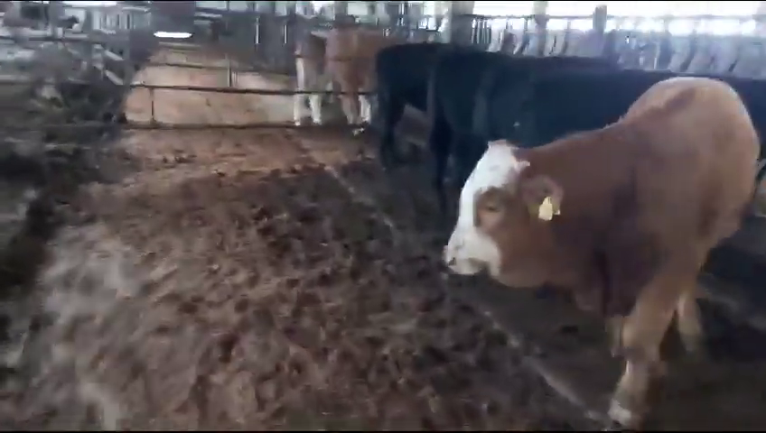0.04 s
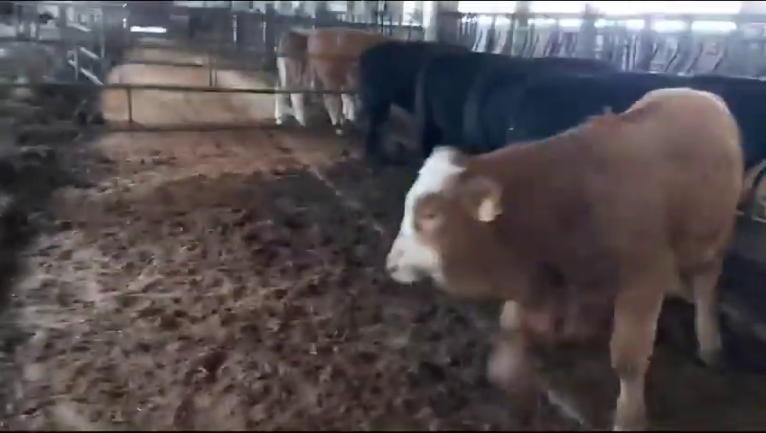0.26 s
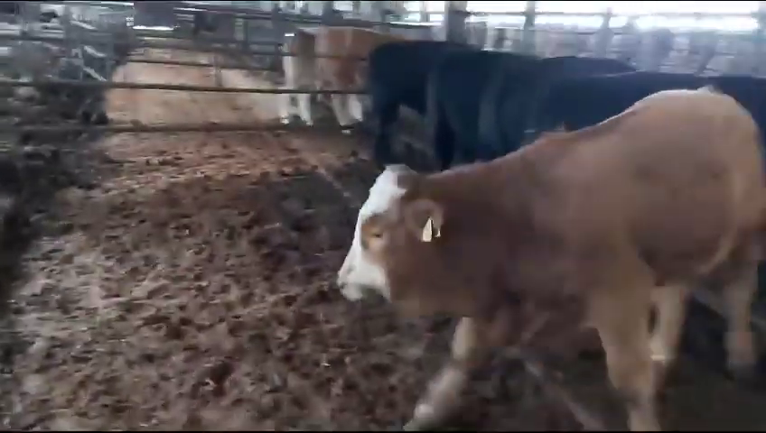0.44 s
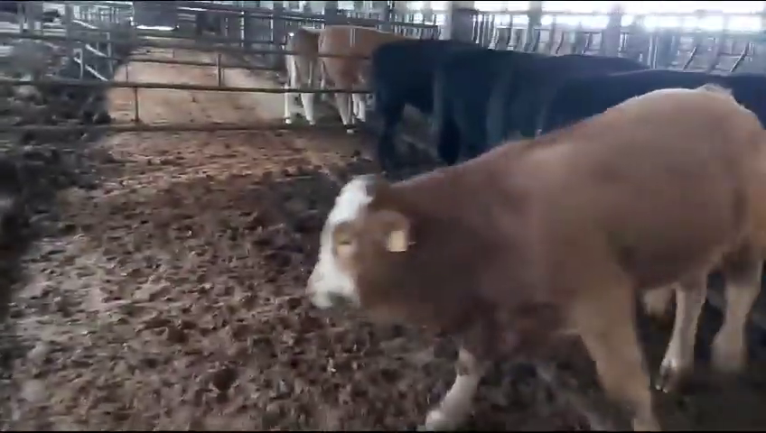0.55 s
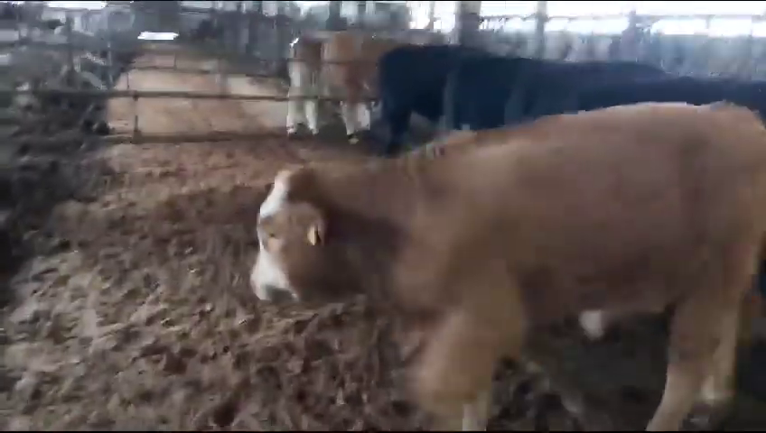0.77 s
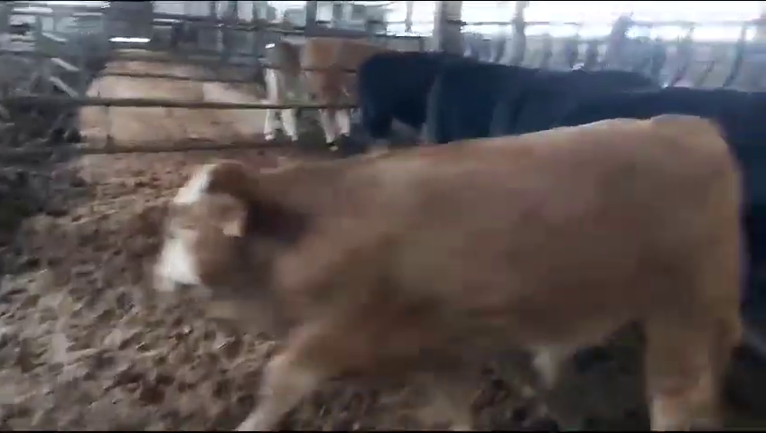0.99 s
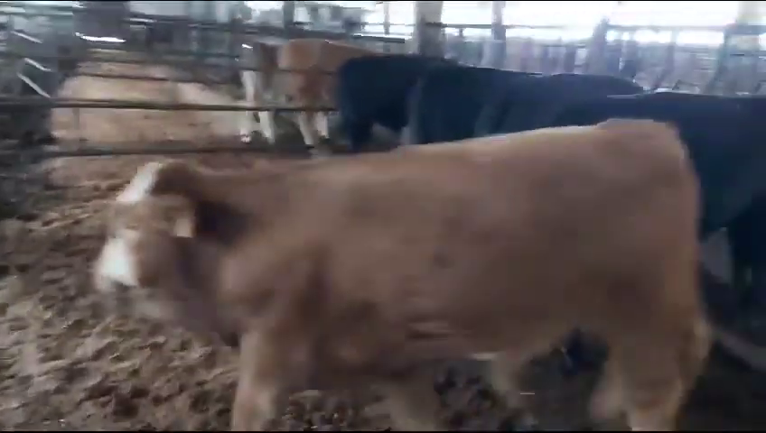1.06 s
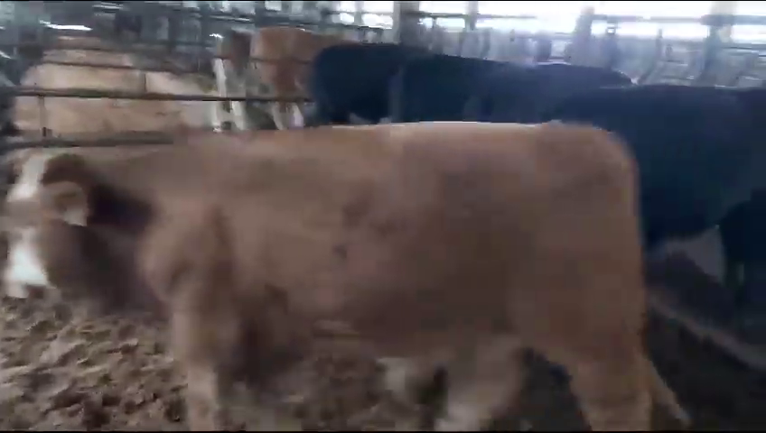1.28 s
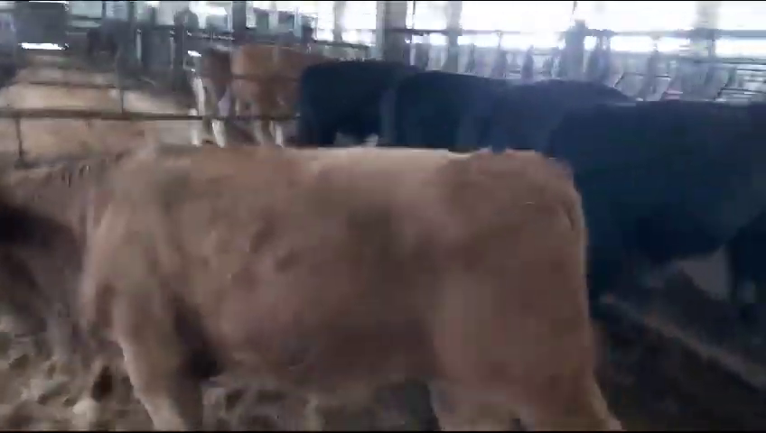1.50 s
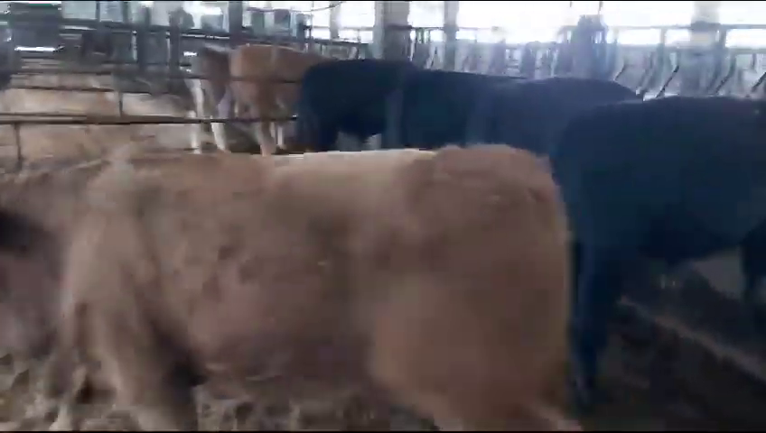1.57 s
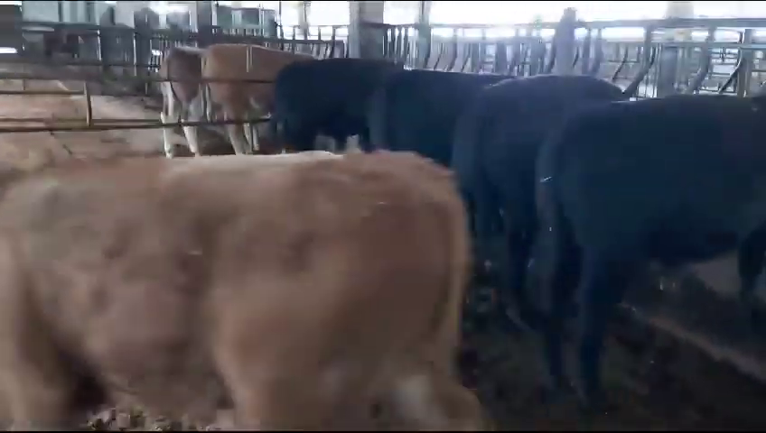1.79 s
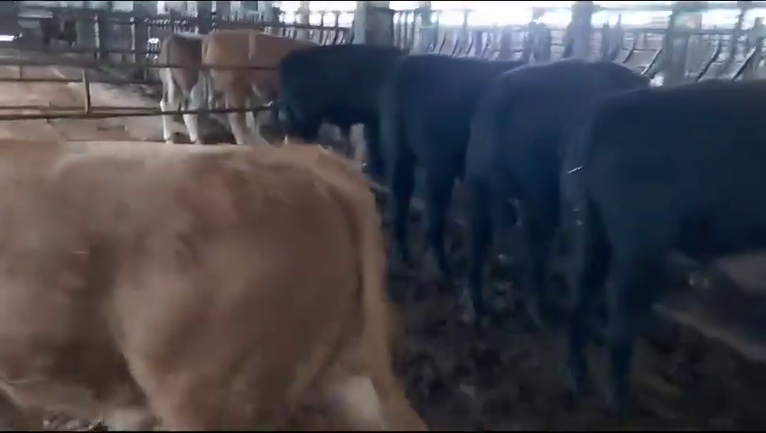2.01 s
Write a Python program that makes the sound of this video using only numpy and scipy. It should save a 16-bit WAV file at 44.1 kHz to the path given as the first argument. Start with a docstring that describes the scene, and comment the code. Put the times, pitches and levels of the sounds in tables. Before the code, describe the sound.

A steel barn fitting is knocked and booms, followed by sharp clicks and soft cattle hoofsteps.

```python
"""Hooves scuff over damp litter as a young steer walks past in a large, quiet barn.
Almost at once a steel fitting is knocked, and its ringing booms through the hall.
The hooves thud, squelch and snap stalks on the soft floor; one lands with a hollow clop.
Two sharp clicks sound right at the left microphone, over a low rumble and faint hiss."""
import sys
import numpy as np
from scipy import signal
from scipy.fft import rfft, irfft
from scipy.io import wavfile

SR = 44100
rng = np.random.default_rng(int(sys.argv[2]) if len(sys.argv) > 2 else 0)


def master(y):
    """Save y as 16-bit WAV."""
    cut = np.clip(np.atleast_2d(y).T, -1, 1)
    pcm = np.round(cut * 32767)  # scale
    wavfile.write(sys.argv[1], SR, pcm.astype(np.int16))


N = 90404
TIME = np.arange(N) / SR
FREQS = np.maximum(np.fft.rfftfreq(N, 1 / SR), 1)
# how alike left and right sound in the barn: (frequency [Hz], likeness [0 to 1])
LIKENESS = [(30, 0.14), (120, 0.97), (300, 0.74), (700, 0.6), (1300, 0), (3000, 0.058), (16000, 0)]


def from_db(db):
    """Turn decibels into a number to multiply by."""
    return 10 ** (np.asarray(db) / 20)


def rms_one(x):
    """Scale a sound to an average strength (rms) of 1."""
    return x / np.sqrt(np.mean(x ** 2) + 1e-20)


def at_hz(points, hz):
    """Read between the rows of a table, giving each octave equal room."""
    return np.interp(np.log(hz), *np.transpose([(np.log(f), v) for f, v in points]))


def panned(db, lean_db):
    """Left and right gains, with the left louder by lean_db."""
    return from_db(db + lean_db * np.array([[.5], [-.5]]))


def coloured(spectrum, source):
    """Give two unrelated noises a tone colour and make them alike in the bass; strength 1."""
    gain = from_db(at_hz(spectrum, FREQS)) * FREQS / np.hypot(FREQS, 20)
    common, side = rfft(source) * gain
    alike = at_hz(LIKENESS, FREQS)
    stereo = np.sqrt(1 + alike) * common + np.sqrt(1 - alike) * side * [[1], [-1]]
    return rms_one(irfft(stereo, N))


def noise(spectrum):
    """Smooth stereo noise with the given tone colour."""
    return coloured(spectrum, rng.standard_normal((2, N)))


def grains(spectrum, per_second=2000, spread_db=3):
    """Tiny collapses of uneven size over a fine hiss."""
    sizes = from_db(spread_db * np.minimum(rng.exponential(1, (2, N)), 4))
    signs = rng.choice([-1, 1], (2, N))
    happens = rng.random((2, N)) < per_second / SR
    return coloured(spectrum, rms_one(sizes * signs * happens) + rng.standard_normal((2, N)))


def swell(peak, rise, fall):
    """A level that climbs to 1 at the peak time, then falls away."""
    return np.exp(-np.maximum((peak - TIME) / rise, (TIME - peak) / fall))


def building(start, rise):
    """A level that grows from nothing towards 1."""
    return 1 - np.exp(-np.maximum(TIME - start, 0) / rise)


def dying(start, fade):
    """A level that jumps to 1, then drops 60 dB over the fade time."""
    return (TIME >= start) * np.exp(-np.log(1000) * np.maximum(TIME - start, 0) / fade)


def ring(start, hz, fade, phase=0):
    """One fading tone of a struck object."""
    return dying(start, fade) * np.sin(2 * np.pi * hz * (TIME - start) + phase)


def pulse(start, spectrum_db):
    """The shortest click with this tone colour; peak 1."""
    cepstrum = irfft(np.log(from_db(spectrum_db)), N)
    # keeping only the first half packs the energy at the start of the click
    shape = irfft(np.exp(rfft(2 * cepstrum[:N // 2], N)), N)
    samples = np.arange(N)
    return np.interp(samples - round(start * SR), samples, shape / abs(shape).max(), left=0)


def barn():
    """The quiet barn: a steady low rumble and faint hiss."""
    colour = [(25, 6), (45, -2), (85, 5.5), (150, 1), (300, 1), (430, -2.5), (580, -16), (800, -5.5),
              (1450, -11.5), (2300, -11), (3400, -17.5), (5000, -12.5), (6900, -9), (8200, -25.5),
              (12000, -18), (16000, -25)]  # (frequency [Hz], relative level [dB])
    return from_db(-61.5) * noise(colour)


def scuffs():
    """Hooves drag through the dry part of the litter."""
    drags = [(0.013, -52.5, 0.15, .13), (0.628, -58, 0.032, 0.24), (.79, -62.5, 0.051, 0.025),
             (1.156, -55, 0.0028, 0.047), (1.189, -49, 0.024, 0.026), (1.376, -56.5, 0.0049, 0.012),
             (1.43, -55.5, 0.029, 0.095)]  # (time [s], level [dB], rise [s], fall [s])
    colour = [(60, -8), (300, 5.5), (700, -0.5), (1400, -2.5), (2300, -5), (3500, -12), (6500, -11.5),
              (8500, -28.5), (12000, -14), (16000, -36)]  # the rustle: (frequency [Hz], relative level [dB])
    return sum(from_db(db) * swell(s, rise, fall) for s, db, rise, fall in drags) * grains(colour)


def squelches():
    """Wet litter squelches under the hooves in short, grainy bursts."""
    # each squeeze: (time [s], level [dB], rise [s], fall [s], left over right [dB])
    squeezes = [(0.245, -52.5, 0.0036, .008, 7), (0.359, -53, 0.0034, 0.06, 3),
                (.5, -49.5, 0.0055, 0.013, 3), (0.759, -44.5, 0.0046, .002, 3),
                (0.766, -52, 0.0059, 0.031, 1), (0.865, -48.5, .002, 0.0088, 4),
                (0.893, -57.5, 0.014, 0.03, 2), (1.099, -58.5, 0.0038, 0.01, 10),
                (1.165, -62, .008, 0.06, 17), (1.19, -57, .008, 0.0024, 16),
                (1.321, -63, 0.019, 0.0067, 13), (1.402, -50.5, 0.018, 0.016, 5),
                (1.49, -52.5, 0.0033, 0.017, 4), (1.75, -52.5, 0.014, 0.021, 5),
                (1.997, -50, 0.0023, .011, 0)]
    colour = [(300, -26), (1000, -4), (2200, -10), (3500, -10.5), (4700, -5), (6000, -1.5), (7000, 1.5),
              (8400, -23.5), (10000, -16), (12000, -5.5), (14500, -21.5), (16000, -21)]  # the wet hiss: (frequency [Hz], relative level [dB])
    level = sum(panned(db, lean) * swell(s, rise, fall) for s, db, rise, fall, lean in squeezes)
    return level * grains(colour)


def stalks():
    """A few stalks snap under the hooves."""
    breaks = [(0.361, -50, 4), (0.754, -41, 17), (0.758, -29.5, 7), (0.7596, -38.5, 5), (.8665, -42, 14),
              (1.1632, -41, 11), (1.1934, -37.5, 3), (1.4901, -47, 4), (1.9925, -47, 2)]  # (time [s], peak level [dB], left over right [dB])
    colour = [(500, -32), (2100, -3), (3600, -22), (5000, -19), (5900, 1), (6400, -3), (6900, -2),
              (8400, -15), (11800, -10.5), (16000, -29.5)]  # one snap: (frequency [Hz], relative level [dB])
    snap = pulse(0, at_hz(colour, FREQS))
    return sum(panned(db, lean) * np.roll(snap, round(s * SR)) for s, db, lean in breaks)


def thuds():
    """Each hoof presses the litter: a low tone with a crumbling noise on top."""
    steps = [(0.124, -54, 0.057, 0.029, 68), (0.376, -43.5, 0.016, 0.034, 73),
             (0.464, -57, 0.014, 0.016, 84), (.525, -45.5, 0.028, .022, 128),
             (0.682, -53.5, 0.005, .03, 105.5), (.742, -51, 0.0071, 0.013, 55),
             (0.888, -57.5, 0.015, 0.037, 117), (1.093, -49.5, 0.0037, 0.021, 94.5),
             (1.434, -48.5, 0.026, 0.032, 69), (1.484, -51, 0.013, 0.017, 74.5),
             (1.969, -65, 0.025, 0.027, 101)]  # (time [s], tone level [dB], rise [s], fall [s], pitch [Hz])
    colour = [(25, 23), (45, -5.5), (75, 1), (120, -5.5), (200, -10.5), (400, -20.5), (900, -41),
              (3000, -30)]  # the crumbling: (frequency [Hz], relative level [dB])
    crumble = from_db(4.5) * noise(colour)
    return sum(from_db(db) * swell(s, rise, fall) * (np.sin(2 * np.pi * hz * (TIME - s)) + crumble)
               for s, db, rise, fall, hz in steps)


def clop():
    """A hoof touches, lands with a hollow ring and sets the hall sounding."""
    contacts = [(1.1762, -37), (1.1817, -31.5)]  # touch and landing: (time [s], level [dB])
    tones = [(407, -0.5, 0.035), (708, -3.5, 0.042), (761, 1, 0.04), (935, 1.5, 0.02), (1400, -16.5, 0.14),
             (1933, -12.5, 0.077), (2177, -15, .06)]  # the hollow ring: (pitch [Hz], relative level [dB], fade time [s])
    hall_colour = [(60, -23), (200, -9), (290, -5.5), (380, 3.5), (550, -10), (760, -1.5), (1300, -14),
                   (2100, -15.5), (3500, -31.5), (16000, -35.5)]  # the echo: (frequency [Hz], relative level [dB])
    hoof = sum(from_db(db + tone_db) * ring(s, hz, fade) * building(s, .5 / hz)
               for s, db in contacts for hz, tone_db, fade in tones)
    landing = contacts[1][0]
    echo = noise(hall_colour) * dying(landing, fade=0.72) * building(landing, rise=0.02)
    return hoof + from_db(-43.5) * echo


def tick():
    """One thin, high tick on both sides, just before the second click."""
    colour = [(3000, -47), (6000, -19), (9300, -34), (11500, -13), (13900, -4), (15300, -4), (16300, -6.5)]  # (frequency [Hz], relative level [dB])
    return from_db(-23.5) * pulse(start=1.0657, spectrum_db=at_hz(colour, FREQS))


def clicks(clack_hz=1840, clack_octaves=0.38, right_db=-30.5):
    """Two dry clicks at the left microphone; little of them reaches the right one."""
    hits = [(.7305, -2, 14800, 2), (1.0795, -11.5, 1880, 6.5)]  # (time [s], peak level [dB], dulled above [Hz], clack boost [dB])
    colour = [(30, -54), (100, -4.5), (200, -5.5), (350, 4.5), (600, 4.5), (1200, -4), (2800, -6.5),
              (3800, -14), (5000, -10.5), (6900, -5.5), (8400, -29.5), (10200, -17.5), (12400, -16),
              (16000, -24.5)]  # one click: (frequency [Hz], relative level [dB])
    clack = np.exp(-(np.log2(FREQS / clack_hz) / clack_octaves) ** 2)
    left = 0
    for s, db, dull_hz, clack_db in hits:
        dulling_db = 10 * np.log10(1 + (FREQS / dull_hz) ** 2)
        left += from_db(db) * pulse(s, at_hz(colour, FREQS) + clack_db * clack - dulling_db)
    return np.array([left, from_db(right_db) * left])


def fitting(knock_s=.2418, push_s=0.0041, left_delay_s=0.00021):
    """The steel fitting is pushed, strikes with a crack, then rings and booms through the hall."""
    crack_colour = [(60, -17), (250, -16.5), (600, -8), (900, -8.5), (1150, 1.5), (1400, -10.5),
                    (1800, -22), (3000, -34.5), (6000, -26), (9000, -72), (16000, -52)]  # the strike: (frequency [Hz], relative level [dB])
    tones = [(122.9, 4.5, 0.3), (276.5, -3.5, 0.98), (381, -8, 0.56), (470, -8, 0.77), (587, 2, .42),
             (656, 1.5, 0.61), (779, 0, 0.62), (803, -4.5, 0.17), (915, -1, 0.31), (989, -1, 0.63),
             (1005, 5.5, 0.41), (1057, -13, 0.69), (1155, -8.5, 0.38), (1216, -12, 0.86), (1271, -3, 0.54),
             (1350, -2, 0.58), (1477, -4.5, 0.67), (1548, -4, 0.45), (1637, -20, 0.37), (1826, -18, 0.39)]  # the ringing steel: (pitch [Hz], relative level [dB], fade time [s])
    boom_colour = [(30, -16), (60, -7), (120, -0.5), (165, -1.5), (215, -11.5), (300, -6.5), (480, -12.5),
                   (700, 1.5), (1200, -4.5), (1600, -10), (2100, -18), (3200, -25), (6500, -31.5),
                   (9000, -44), (16000, -38)]  # the boom in the hall: (frequency [Hz], relative level [dB])
    boom_fades = [(50, 1.2), (150, 0.77), (350, 1.09), (700, 0.59), (1300, 0.72), (1800, 0.72), (3200, 0.5),
                  (6000, 0.37), (16000, 0.93)]  # how long it lasts: (frequency [Hz], fade time [s])
    build_cycles = 0.87  # ringing needs about one cycle to build, so the bass arrives late
    crack = np.array([pulse(knock_s + delay, at_hz(crack_colour, FREQS)) for delay in (left_delay_s, 0)])
    steel = 0
    for hz, db, fade in tones:
        # higher tones reach the two sides further out of step
        offset = rng.choice([-1, 1]) * np.arccos(at_hz(LIKENESS, hz)) / 2
        tone = ring(knock_s, hz, fade, phase=np.array([[offset], [-offset]]))
        steel += from_db(db) * tone * building(knock_s, build_cycles / hz)
    wash = noise(boom_colour)
    wash_spectrum = rfft(wash)
    centres = np.log([hz for hz, _ in boom_fades])
    boom = 0
    for (hz, fade), this_band in zip(boom_fades, np.eye(len(boom_fades))):
        share = np.interp(np.log(FREQS), centres, this_band)
        band = irfft(wash_spectrum * share, N)
        boom += band * dying(knock_s, fade) * building(knock_s, build_cycles / hz)
    push = wash * swell(knock_s, push_s, push_s) * (TIME < knock_s)
    return from_db(-32.5) * push + from_db(-14) * crack + from_db(-36.5) * steel + from_db(-25) * boom


def scene():
    """The knock, the clicks and the hooves over the barn's background."""
    return fitting() + clicks() + tick() + clop() + thuds() + squelches() + scuffs() + stalks() + barn()


def record(dry):
    """Soften the deepest rumble and cut off the very highest treble."""
    low_cut = signal.butter(2, 49, "high", fs=SR, output="sos")
    high_cut = signal.ellip(10, .2, 70, 16100, fs=SR, output="sos")
    return signal.sosfilt(high_cut, signal.sosfilt(low_cut, dry))


dry = scene()
out = record(dry)
master(out)
```